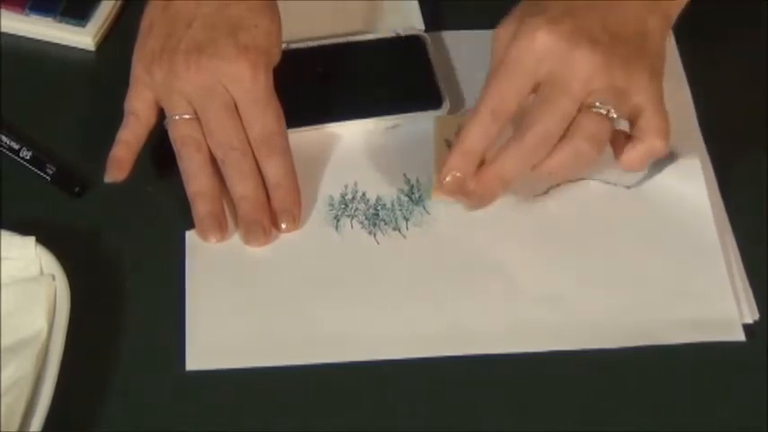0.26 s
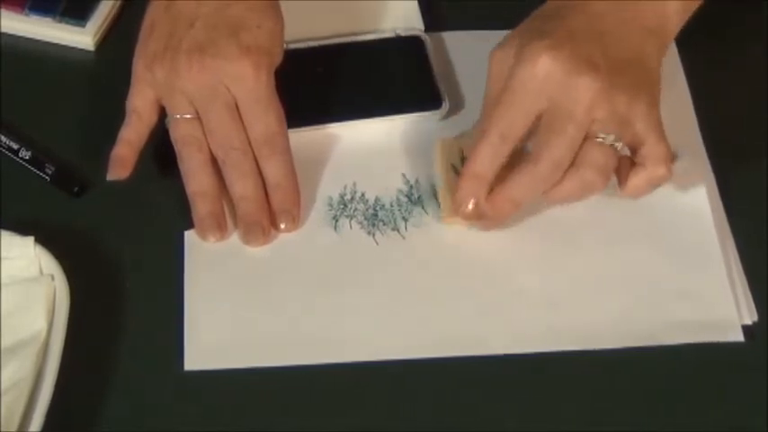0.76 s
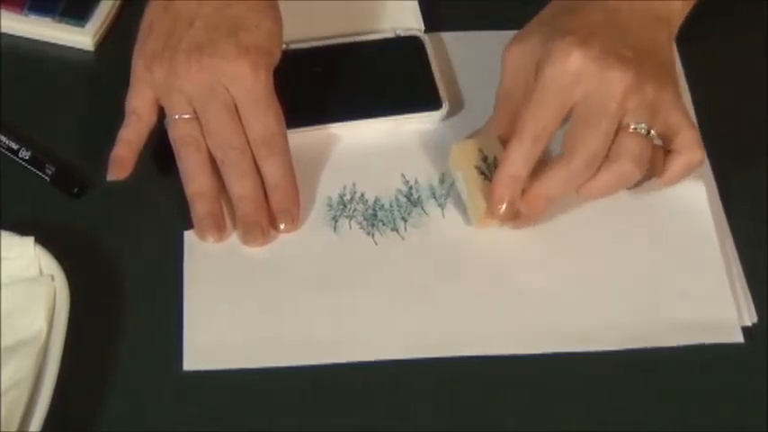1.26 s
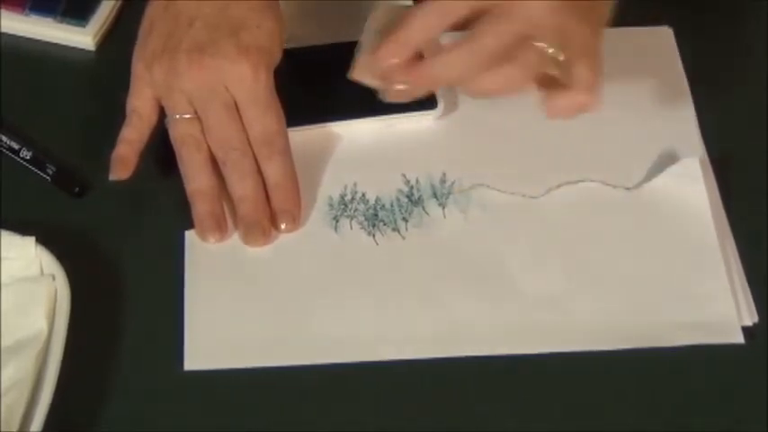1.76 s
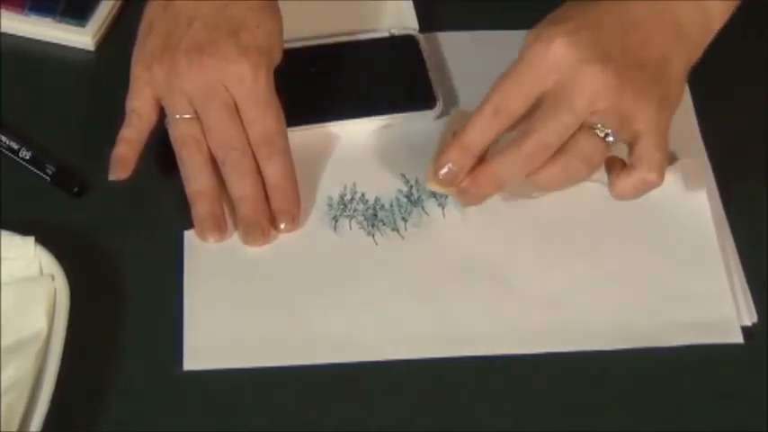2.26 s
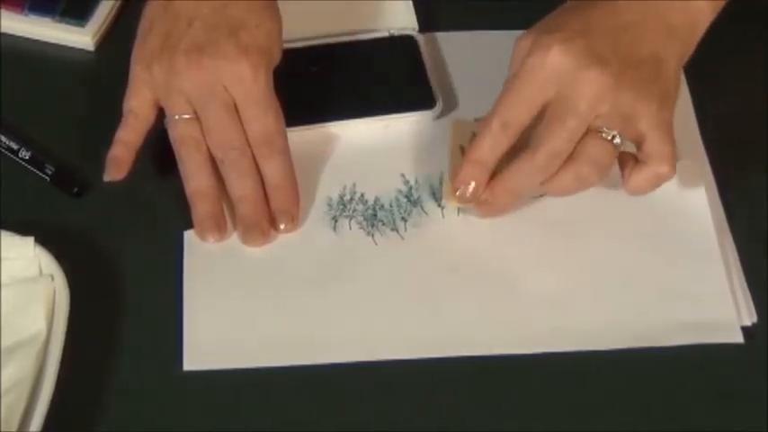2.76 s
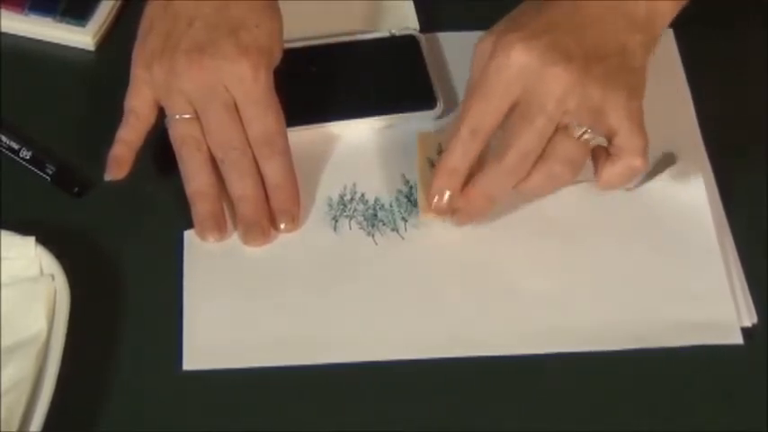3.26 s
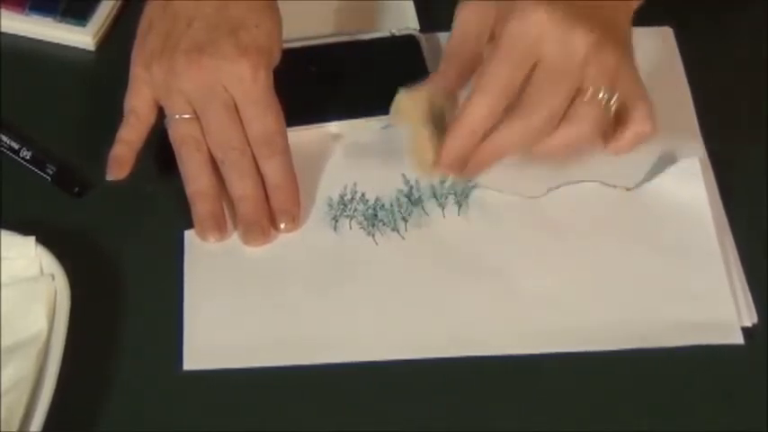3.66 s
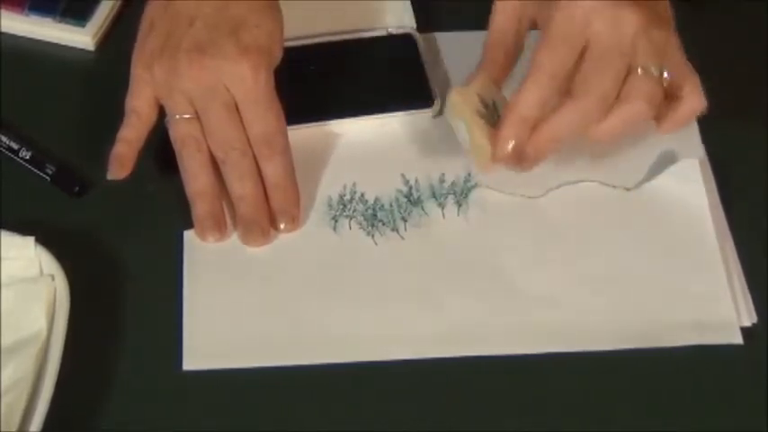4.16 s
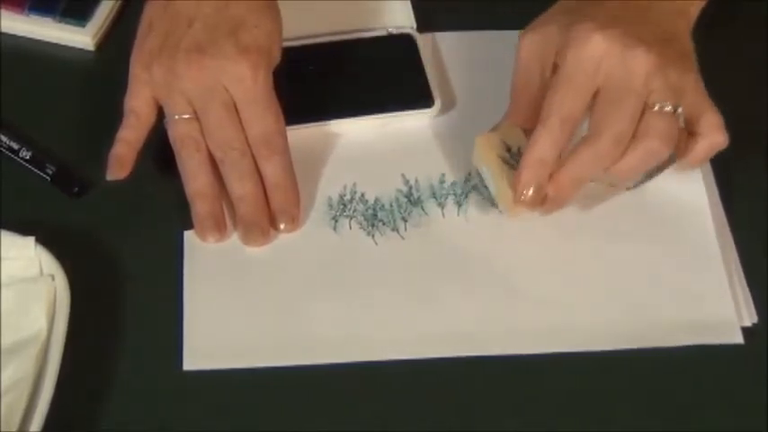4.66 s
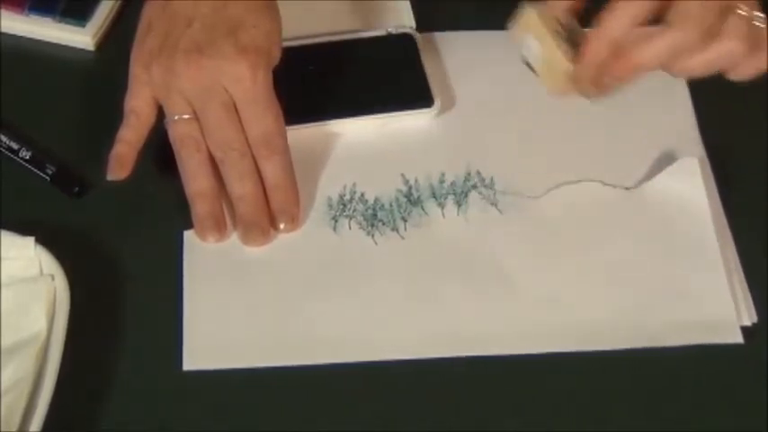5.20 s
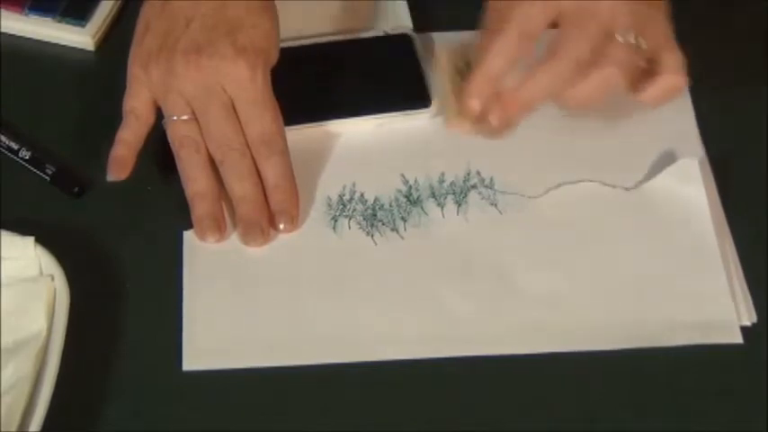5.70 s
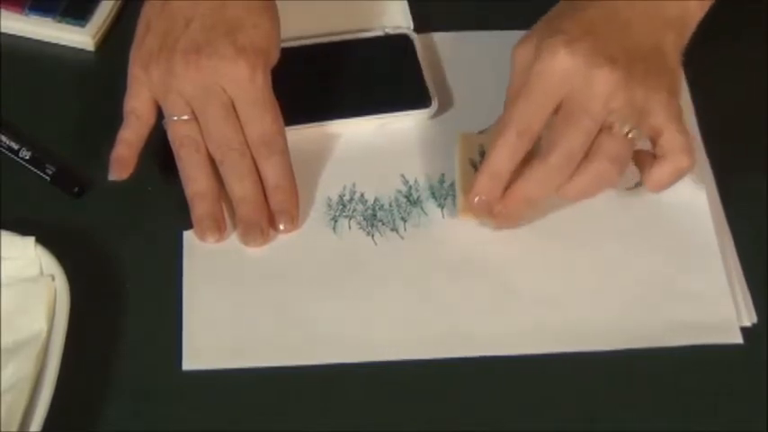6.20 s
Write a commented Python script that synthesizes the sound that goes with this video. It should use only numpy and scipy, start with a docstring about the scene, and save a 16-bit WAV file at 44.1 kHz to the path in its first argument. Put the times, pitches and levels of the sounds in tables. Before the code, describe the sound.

Quick woody knocks and papery snaps of a hand stamp on a tabletop, broken by soft ink pad thuds over faint hum and hiss.

```python
"""A wooden rubber stamp is dabbed on sheets of paper lying on a table, now and then on its ink pad.
Each blow rings damped modes of the table top or pad; decaying noise bursts make the block's clack
and the paper's snap. Tacky ink peels off the paper in short swells of crackle.
A double early echo and a small room's diffuse tail follow, over quiet steady hum, hiss and a thin whine."""
import sys
import numpy as np
from scipy import signal
from scipy.fft import rfft, irfft
from scipy.io import wavfile

SR = 44100
rng = np.random.default_rng(int(sys.argv[2]) if len(sys.argv) > 2 else 0)


def output_pcm(signal):
    """Save a mono or channel-first signal as 16-bit PCM at the path in sys.argv[1].

    Samples are clipped to [-1, 1] before scaling.
    """
    pcm = np.clip(np.atleast_2d(signal).T, -1, 1) * 32767
    wavfile.write(sys.argv[1], SR, np.round(pcm).astype(np.int16))


N = 284004
LEAD_SAMPLES, RING_SAMPLES = 4410, 22050  # run-in before time zero; length of one ring

# stamp on paper: start_s, strength_db, edge_knock_db, face_slap_db, clack_pitch_hz
PAPER_TAPS = [(.507, -9.5, -1.5, -0.5, 1250), (0.8249, -3, -1.5, -2.5, 1250), (1.0543, 3.5, 1.5, 4, 1460),
              (1.2636, 4.6, 3.5, 4.5, 1520), (2.442, -16, -1.5, 0, 1400), (2.7942, 0.8, 0.5, -7.5, 1400),
              (3.1031, 2.8, 1, 4.5, 1900), (3.3536, -0.2, -7.5, -5.5, 680), (3.588, -1.33, -1, -1, 1200),
              (4.3912, -0.7, 2.5, -3.5, 1420), (4.6358, -4, 3.5, -4, 967), (4.7941, -2.5, -1, -0.5, 1110),
              (4.942, .5, 2.5, 5, 870), (6.0758, 2.5, 4, 5, 780), (6.2835, -1.9, -7.5, -8.5, 1350)]
# stamp on ink pad: start_s, strength_db
PAD_TAPS = [(-.016, -4), (1.6528, 1.8), (3.9563, 0.5), (5.5355, 0.6)]
# table top struck through the paper: mode_hz, level_db, t60_s
TABLE_MODES = [(73, -27, .063), (97, -41, .25), (139, -15, .078), (167, -14, .02), (234, -18.5, .13),
               (296, -7, .042), (347, -16, .124), (371, -28, .3), (406, -11, .026), (476, -18, .1),
               (616, -20, .034), (752, -27, .088), (805, -33, .11), (857, -18, .02), (1090, -29, .09),
               (1186, -29, .05), (1280, -39, .09), (1372, -31, .06), (1490, -36, .055)]
# ink pad in its case on the table: mode_hz, level_db, t60_s
PAD_MODES = [(72, -32, .125), (99, -37, .148), (136, -28, .28), (246, -9, .042), (293, -11, .092),
             (331, -18, .2), (389, -1, .02), (437, 0, .033), (472, -9, .119), (654, -20, .062),
             (682, -27, .2), (738, -17, .04), (890, -24, .042), (1003, -24, .024), (1278, -31, .098),
             (1378, -33, .11), (1509, -31, .053)]
# share of the hardness a mode receives; a slow press favours the bass, a quick blow the middle: hz, share
HARDNESS_SHARE = [(170, -1), (300, 0), (430, 1), (500, 1), (620, 0)]
# share of the overtone level a mode receives: hz, share
OVERTONE_SHARE = [(500, 0), (620, 1)]
# a stronger blow is quicker, so its contact is harder
HARDNESS_DB, HARDNESS_DB_PER_DB = 0.3, 0.62
# the more the wooden edge knocks, the more the table's overtones ring
OVERTONES_DB, OVERTONES_DB_PER_DB = -2, 0.65
# clack and snap of a plain 0 dB blow on paper; both grow with its strength
PAPER_CLACK_DB, PAPER_SNAP_DB = -23.5, -22.5
# the soft pad muffles both
PAD_CLACK_DB, PAD_CLACK_HZ, PAD_SNAP_DB = -27, 637, -37
PAD_HARDNESS_DB, PAD_OVERTONES_DB = 0, 0.5

# wood block colour: hz, relative_level_db
CLACK_COLOUR = [(400, -27), (700, 9), (1100, 8.5), (1450, 4), (1800, -4), (2300, 0.5), (2700, -10.5),
                (3300, -8), (6000, -15), (16000, -45)]
# paper colour: hz, relative_level_db
SNAP_COLOUR = [(500, -44), (1500, -42), (2400, 0), (3300, 10.5), (5000, 4.5), (7500, 2), (11000, 2),
               (16000, -12)]
# left-right likeness of the contact noises: hz, correlation
CONTACT_LIKENESS = [(500, 0.96), (3000, 0.98), (12000, 0.98)]

# inky rubber peels off the paper: start_s, level_db, time_to_peak_s
PEELS = [(0.938, -52, 0.0072), (1.336, -51, 0.0058), (1.492, -44, 0.00082), (4.686, -45.5, 0.0063),
         (4.842, -49, 0.013), (4.898, -46.5, 0.0042)]
PEEL_CENTRE_HZ = 8000

# reverberation level per octave band: hz, level_db
ROOM_LEVEL = [(70, -19), (150, -8.5), (280, -19), (450, -17), (900, -9.5), (3000, -14), (12000, -13)]
# reverberation time: hz, t60_s
ROOM_T60 = [(100, 0.32), (400, 0.47), (1000, 0.25), (3000, 0.29), (12000, 0.2)]
# left-right likeness of the reverberation: hz, correlation
ROOM_LIKENESS = [(150, 0.97), (400, 0.9), (1000, 0.77), (3000, 0.78), (12000, 0.77)]

# rumble and hiss colour: hz, relative_level_db
BACKGROUND_COLOUR = [(15, -55), (25, -9.5), (92, -11.5), (123, -4), (149, -9.5), (242, -6), (384, -9.5),
                     (591, -6.5), (714, -12.5), (911, -7), (1020, -12.5), (1230, -11.5), (1940, -15.5),
                     (2990, -18.5), (16000, -23.5)]
BACKGROUND_DB = -46
# left-right likeness of the background: hz, correlation
BACKGROUND_LIKENESS = [(60, 1), (300, 0.66), (1000, 0.4), (3000, 0.36), (14000, 0.86)]
# narrow noise bands: centre_hz, half_width_hz, level_db
HUMS = [(119, 1.7, -60.5), (921, 17, -58), (906, 22, -63.5), (1130, 25, -62), (3020, 200, -63.5)]
WHINE_HZ, WHINE_DB = 15734.5, -68
CUTOFF_HZ = 16100


def from_db(db):
    """Decibels to gain."""
    return 10 ** (np.asarray(db) / 20)


def at_hz(points, hz):
    """Read a table on a log-frequency axis."""
    known_hz, values = np.transpose(points)
    return np.interp(np.log(np.maximum(hz, 1)), np.log(known_hz), values)


def stereo_noise(size, gain_at, likeness):
    """Noise of rms 1 with a given colour and left-right likeness."""
    hz = np.fft.rfftfreq(size, 1 / SR)
    alike = np.clip(at_hz(likeness, hz), 0, .999)
    mid, side = rfft(rng.standard_normal((2, size))) * gain_at(hz)
    left_right = np.sqrt(1 + alike) * mid + np.sqrt(1 - alike) * side * [[1], [-1]]
    noise = irfft(left_right, size)
    return noise / noise.std()


def coloured(size, spectrum, likeness):
    """Stereo noise of rms 1 that follows a spectrum table."""
    return stereo_noise(size, lambda hz: from_db(at_hz(spectrum, hz)), likeness)


def dying(t60_s):
    """Exponential decay, 60 dB per t60, over the length of one ring."""
    return np.exp(-np.log(1000) * np.arange(RING_SAMPLES) / SR / t60_s)


def add(track, sound, start_s):
    """Mix a sound into a track that begins LEAD_SAMPLES before time zero."""
    start = LEAD_SAMPLES + round(start_s * SR)
    track[:, start:start + RING_SAMPLES] += sound[:, :track.shape[1] - start]


def paper_blows():
    """Strength sets hardness, clack and snap; edge knock adds overtones and clack, face slap adds snap."""
    blows = []
    for start_s, strength_db, knock_db, slap_db, clack_hz in PAPER_TAPS:
        hardness_db = HARDNESS_DB + HARDNESS_DB_PER_DB * strength_db
        overtones_db = OVERTONES_DB + OVERTONES_DB_PER_DB * knock_db
        clack_db = PAPER_CLACK_DB + strength_db + knock_db
        snap_db = PAPER_SNAP_DB + strength_db + slap_db
        blows.append((start_s, strength_db, hardness_db, overtones_db, clack_db, clack_hz, snap_db))
    return blows


def pad_blows():
    """Dabs on the ink pad are set apart by strength alone."""
    return [(start_s, strength_db, PAD_HARDNESS_DB, PAD_OVERTONES_DB,
             PAD_CLACK_DB + strength_db, PAD_CLACK_HZ, PAD_SNAP_DB + strength_db)
            for start_s, strength_db in PAD_TAPS]


def taps(blows, modes, scatter_db, clack_t60_s, snap_t60_s, rock_s, rock_db,
         treble_tail_db, treble_tail_t60_s):
    """Support thumps, block clacks, an edge snaps, the face rocks flat; a faint treble room tail follows."""
    out = np.zeros((2, LEAD_SAMPLES + N))
    for start_s, thump_db, hardness_db, overtones_db, clack_db, clack_hz, snap_db in blows:
        body = from_db(thump_db) * thump(modes, hardness_db, overtones_db, scatter_db)
        knock = clack(clack_db, clack_hz, clack_t60_s)
        treble = coloured(RING_SAMPLES, SNAP_COLOUR, CONTACT_LIKENESS)
        treble_tail = from_db(treble_tail_db) * treble * dying(treble_tail_t60_s)
        edge_and_tail = from_db(snap_db) * (snap(snap_t60_s) + treble_tail)
        add(out, body + knock + edge_and_tail, start_s)
        rock = from_db(snap_db + rock_db) * snap(snap_t60_s)
        add(out, rock, start_s + rock_s * rng.uniform(0.38, 2.2))
    return out


def thump(modes, hardness_db, overtones_db, scatter_db, port_phase_rad=0.071):
    """Damped modes of alternating sign; high ones vary with the spot struck, the right leads in phase."""
    hz, level_db, t60_s = np.transpose(modes)
    upper_db = overtones_db + scatter_db * rng.standard_normal(len(hz))
    mode_db = level_db + hardness_db * at_hz(HARDNESS_SHARE, hz) + upper_db * at_hz(OVERTONE_SHARE, hz)
    gains = from_db(mode_db) * (-1) ** np.arange(len(hz))
    angle = 2 * np.pi * hz[:, None] * np.arange(RING_SAMPLES) / SR
    decay = dying(t60_s[:, None])
    return np.array([gains @ (np.sin(angle + side * port_phase_rad) * decay) for side in (-1, 1)])


def clack(level_db, pitch_hz, t60_s, peak_db=5.5, width_octaves=0.49):
    """The wood block knocks as decaying noise; the edge that lands first sets its spectral peak."""
    def colour(hz):
        peak = np.exp(-(np.log2((hz + 1) / pitch_hz) / width_octaves) ** 2)
        return from_db(at_hz(CLACK_COLOUR, hz) + peak_db * peak)
    return from_db(level_db) * stereo_noise(RING_SAMPLES, colour, CONTACT_LIKENESS) * dying(t60_s)


def snap(t60_s):
    """The face slaps the paper: a very short burst with a smooth, unpitched spectrum."""
    burst = coloured(RING_SAMPLES, SNAP_COLOUR, CONTACT_LIKENESS) * dying(t60_s)
    magnitude = from_db(at_hz(SNAP_COLOUR, np.fft.rfftfreq(RING_SAMPLES, 1 / SR)))
    # keep the burst's phase, replace its ragged magnitude
    phase = np.angle(rfft(burst))
    smooth = irfft(magnitude * np.exp(1j * phase), RING_SAMPLES) * dying(10 * t60_s)
    return smooth * np.linalg.norm(burst) / np.linalg.norm(smooth)


def peels(grain_db=4.5, width_octaves=3.5):
    """Tacky ink lets go in a short swell of tiny crackles: broad hiss in grains of random level."""
    out, t_s = np.zeros((2, LEAD_SAMPLES + N)), np.arange(RING_SAMPLES) / SR

    def colour(hz):
        return np.exp(-(np.log2((hz + 1) / PEEL_CENTRE_HZ) / width_octaves) ** 2)

    for start_s, level_db, peak_s in PEELS:
        hiss = stereo_noise(RING_SAMPLES, colour, CONTACT_LIKENESS)
        grain_gains = from_db(grain_db * rng.standard_normal(RING_SAMPLES))
        grains = np.repeat(grain_gains, 20)[:RING_SAMPLES]  # each held 20 samples
        swell = (t_s / peak_s) * np.exp(1 - t_s / peak_s)
        add(out, from_db(level_db) * hiss * grains * swell, start_s)
    return out


def flutter(x, lag_s, first_db, second_db):
    """Sound bounces twice between the table and a hard surface facing it."""
    at = np.arange(x.shape[1])

    def late(delay_s):
        return np.array([np.interp(at - delay_s * SR, at, channel, left=0) for channel in x])

    return x + from_db(first_db) * late(lag_s) + from_db(second_db) * late(2 * lag_s)


def room(x, build_s):
    """Diffuse tail: octave bands of noise-like reflections build up and die, each at its own rate."""
    response, t_s = 0, np.arange(RING_SAMPLES) / SR
    for hz in 62.5 * 2 ** np.arange(9):
        edges_hz = [hz / np.sqrt(2), min(hz * np.sqrt(2), .45 * SR)]
        band = signal.butter(2, edges_hz, "band", fs=SR, output="sos")
        envelope = dying(at_hz(ROOM_T60, hz)) * (1 - np.exp(-(t_s / build_s) ** 2))
        noise = stereo_noise(RING_SAMPLES, np.ones_like, ROOM_LIKENESS)
        reflections = noise * envelope / np.linalg.norm(envelope)
        response = response + from_db(at_hz(ROOM_LEVEL, hz)) * signal.sosfilt(band, reflections)
    mono = x.mean(axis=0)[None]
    return signal.fftconvolve(mono, response, axes=1)[:, :x.shape[1]]


def background():
    """Room rumble and microphone hiss as coloured noise, hums as narrow noise bands, the whine as a sine."""
    out = from_db(BACKGROUND_DB) * coloured(N, BACKGROUND_COLOUR, BACKGROUND_LIKENESS)
    for centre_hz, half_width_hz, level_db in HUMS:
        def resonance(hz):
            return 1 / (1 + ((hz - centre_hz) / half_width_hz) ** 2)
        out += from_db(level_db) * stereo_noise(N, resonance, BACKGROUND_LIKENESS)
    whine = np.sqrt(2) * np.sin(2 * np.pi * WHINE_HZ * np.arange(N) / SR)
    return out + from_db(WHINE_DB) * whine


def scene():
    """Taps and peels reach the microphone directly, by early echoes and through the room."""
    paper = taps(paper_blows(), TABLE_MODES, scatter_db=1.6, clack_t60_s=0.04, snap_t60_s=0.0092,
                 rock_s=0.0011, rock_db=-16.5, treble_tail_db=-19, treble_tail_t60_s=0.075)
    pad = taps(pad_blows(), PAD_MODES, scatter_db=1.0, clack_t60_s=0.081, snap_t60_s=0.022,
               rock_s=0.0046, rock_db=-8, treble_tail_db=-9.5, treble_tail_t60_s=0.14)
    near = flutter(paper + pad + peels(), lag_s=.0097, first_db=-9, second_db=-20)
    # the pad lies further from the microphone, so more of it arrives as reverberation
    tail = room(near + 0.13 * pad, build_s=0.011)
    return (near + tail)[:, LEAD_SAMPLES:] + background()


def limiter(x, threshold_db, ratio):
    """Each new highest peak above the threshold pushes the gain down smoothly; it stays down."""
    peak_db = 20 * np.log10(np.abs(x).max(axis=0) + 1e-9)
    over_db = np.maximum(peak_db - threshold_db, 0)
    held_db = np.maximum.accumulate(ratio * over_db)
    cut_db = signal.lfilter([.002], [1, -.998], held_db)  # 11 ms time constant
    return x * from_db(-cut_db)


def record(dry):
    """Gain is held down after loud taps, the tallest peaks are rounded, the top is cut steeply."""
    levelled = limiter(dry, threshold_db=-4.0, ratio=0.29)
    rounded = levelled / (1 + (levelled / .9) ** 8) ** (1 / 8)
    low_pass = signal.ellip(12, .1, 80, CUTOFF_HZ, fs=SR, output="sos")
    return signal.sosfilt(low_pass, rounded)


dry = scene()
out = record(dry)
output_pcm(out)
```